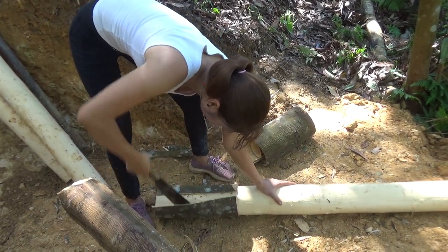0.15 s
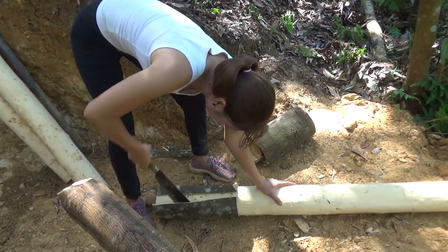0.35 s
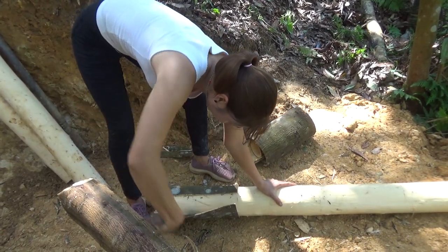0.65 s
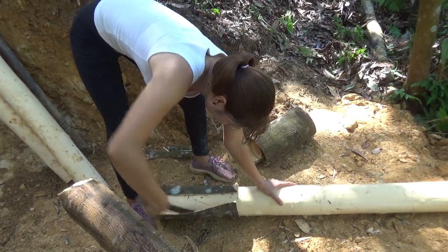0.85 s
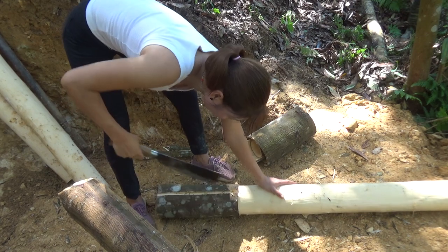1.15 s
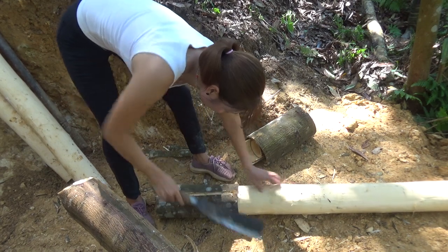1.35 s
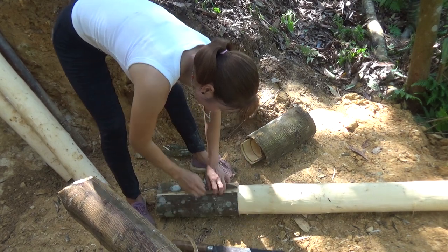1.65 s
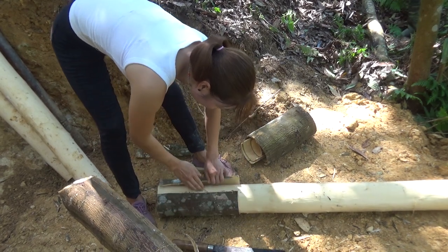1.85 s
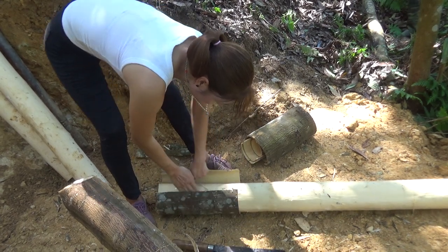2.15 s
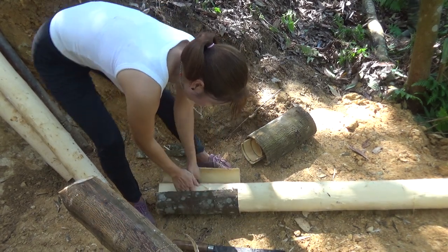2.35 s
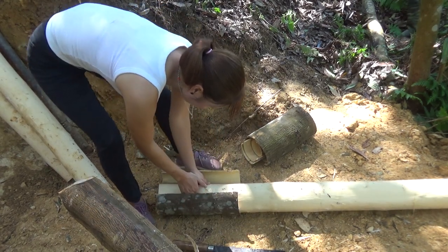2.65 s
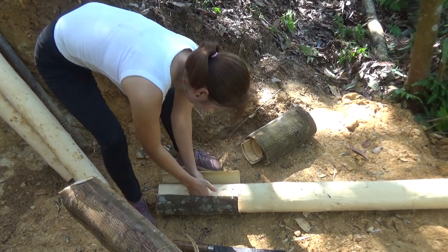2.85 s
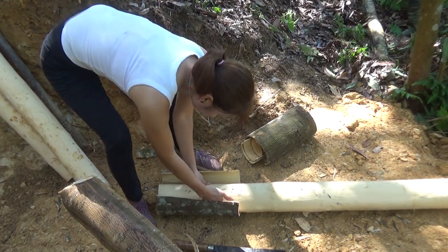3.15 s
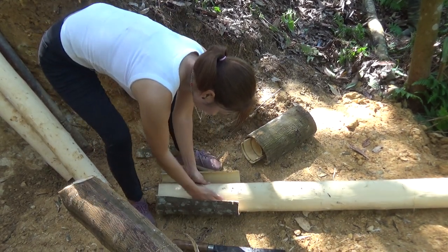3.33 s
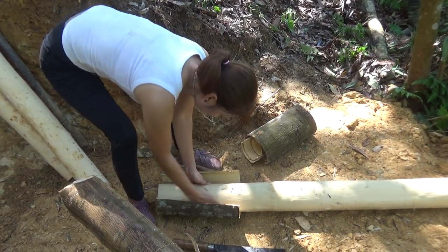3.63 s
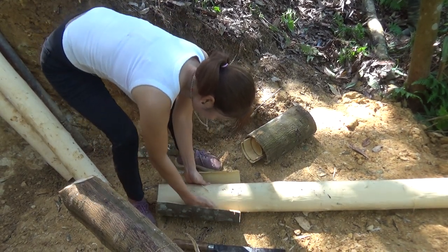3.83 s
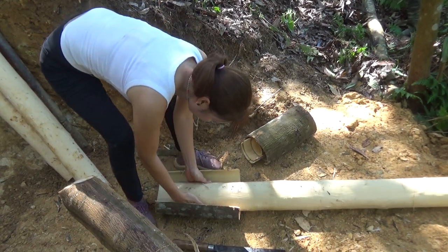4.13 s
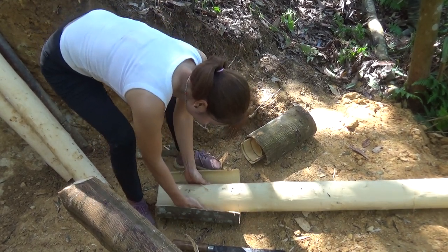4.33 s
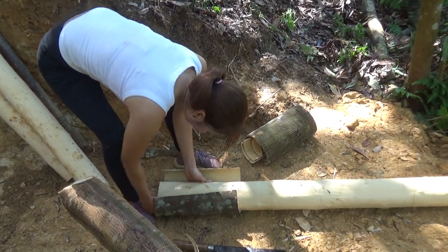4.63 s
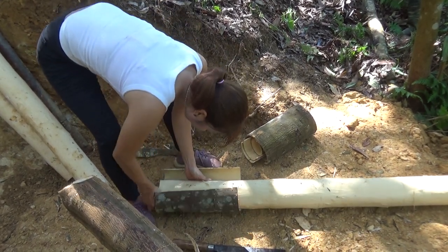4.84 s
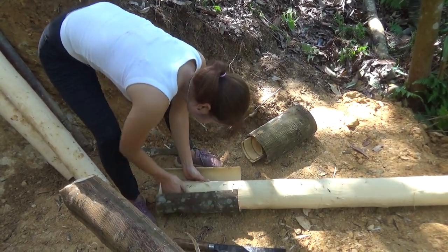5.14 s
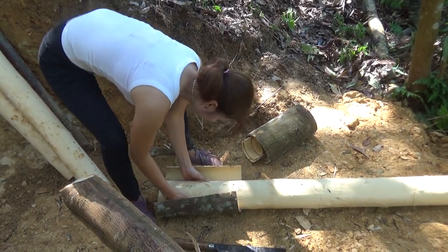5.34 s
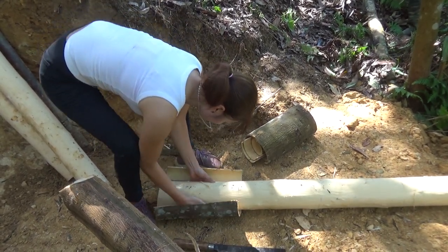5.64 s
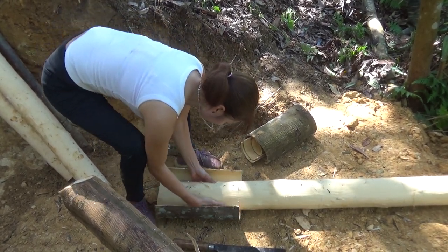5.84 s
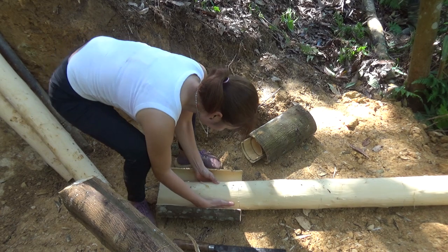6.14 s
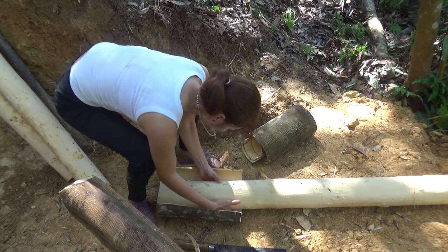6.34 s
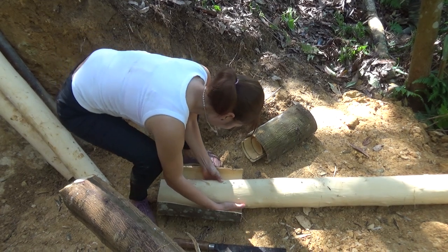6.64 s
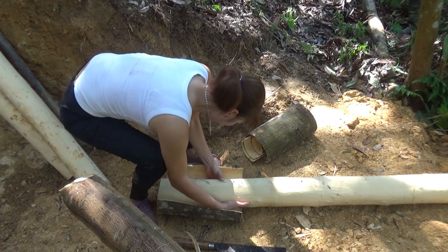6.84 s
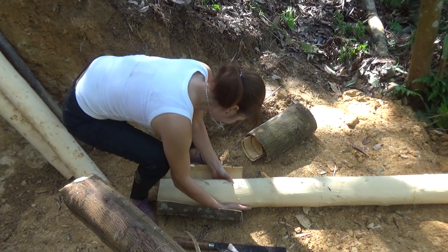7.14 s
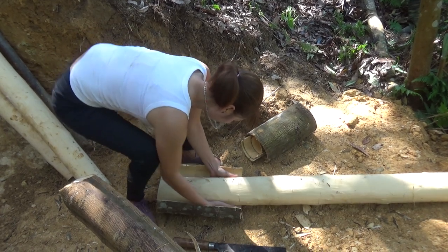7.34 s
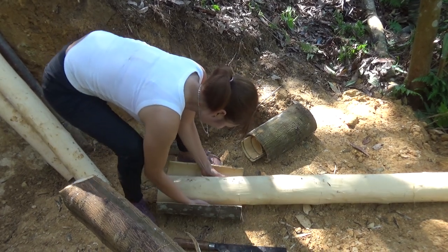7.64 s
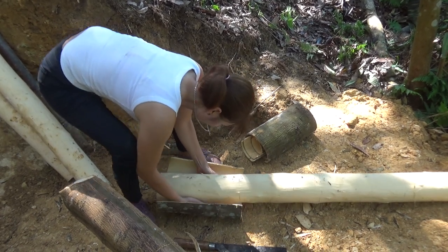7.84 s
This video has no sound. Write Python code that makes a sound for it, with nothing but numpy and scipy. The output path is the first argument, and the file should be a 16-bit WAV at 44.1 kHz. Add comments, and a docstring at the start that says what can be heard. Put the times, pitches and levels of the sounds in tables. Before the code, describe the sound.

Close, crisp ripping and snapping of bark peeled from a fresh log, after a blade rasps and clanks down, with insects droning faintly.

```python
"""A fresh log on a forest floor, with a close, nearly mono microphone pair. A machete scores the bark,
rasps out of the cut at 1 s and drops ringing on the dirt at 1.5 s. From 1.7 s two hands peel the bark
off as one curved shell: wet fibres tear, snap and rip, and the hollow shell resonates with them.
The sharpest crack comes at 5.5 s; near 7 s the shell flops down, and a last few fibres tear.
All around, insects drone in still air and a few far birds chirp."""
import sys
import numpy as np
from scipy import signal
from scipy.fft import rfft, irfft, next_fast_len
from scipy.io import wavfile
from scipy.ndimage import uniform_filter1d, map_coordinates

SR = 44100
rng = np.random.default_rng(int(sys.argv[2]) if len(sys.argv) > 2 else 0)


def dump(signal):
    """Clip the signal to [-1, 1] and save it as 16-bit WAV at the path in sys.argv[1]."""
    limited = np.clip(np.atleast_2d(signal).T, -1, 1)
    pcm = np.round(limited * 32767).astype(np.int16)
    wavfile.write(sys.argv[1], SR, pcm)


N = 351904

# modes of bark and log: (frequency [Hz], level [dB], t60 [s])
WOOD_MODES = [(472, -15, 0.038), (597, -2, 0.097), (668, 0.5, 0.12), (821, 9, 0.04), (1140, -1.5, 0.051),
              (1380, -3, 0.054), (1920, -14, 0.072), (2260, -1, 0.058), (2850, -12, 0.03)]


def peeling():
    """Wet fibres part by the thousand: a crisp hiss that also sounds the shell. Gives tugs and rips."""
    # tugs on the bark: (start [s], rise [s], hold [s], fibre level [dB], shell level [dB])
    tugs = [(-.05, 0.04, 0.018, -46.5, -57), (0.336, .05, 0.017, -55.5, -60.5),
            (0.516, 0.095, 0.12, -43, -53), (2.749, 0.18, 0.26, -38.5, -45.5),
            (3.327, 0.018, 0.042, -52.5, -60), (3.405, .11, 0.027, -32.5, -41.5),
            (3.66, 0.056, 0.023, -41.5, -55), (3.738, 0.096, 0.054, -35, -46.5),
            (4.04, 0.017, 0.058, -41, -59.5), (4.122, 0.12, 0.096, -38, -49.5),
            (4.368, .11, 0.014, -35, -45.5), (4.526, .02, 0.076, -54, -53), (5.14, 0.16, 0.031, -44.5, -49),
            (5.358, 0.031, .06, -44.5, -53.5), (5.441, 0.085, 0.034, -36.5, -43),
            (5.57, .03, 0.097, -43.5, -54), (5.685, 0.067, 0.089, -41, -55.5),
            (5.885, 0.14, 0.036, -41.5, -55), (6.042, .09, 0.17, -41, -53.5),
            (6.295, 0.069, .12, -44, -55.5), (6.486, 0.019, 0.26, -40.5, -54),
            (6.747, .08, 0.071, -39.5, -61), (6.933, 0.022, .035, -40, -58), (7.313, 0.042, 0.42, -43, -58),
            (7.76, 0.13, .15, -38.5, -53.5)]
    # the bark gives way at once: (start [s], rise [s], hold [s], level [dB])
    rips = [(2.341, 0.023, 0.0044, -36.5), (4.455, 0.029, 0.019, -24.5), (4.472, 0.0012, 0.0034, -21),
            (4.491, .004, 0.0047, -18.5), (6.151, .018, 0.019, -34), (6.504, 0.0044, 0.016, -41),
            (6.936, .001, 0.0052, -24), (6.947, 0.004, 0.046, -37.5)]
    # hands shift on the bark: (start [s], length [s], level [dB])
    rustles = [(0.136, 0.58, -63.5), (1.75, 0.23, -61), (2.425, .33, -58), (4.595, 0.46, -64)]
    lead_s = 0.0078  # the shell sounds just before the fibres part
    hand_damping_db_per_s = 12.5
    tear = np.sqrt(sum((amp(db) * effort(*timing)) ** 2 for *timing, db, _ in tugs))
    hollow = np.sqrt(sum((amp(db) * effort(s - lead_s, rise, hold, hand_damping_db_per_s)) ** 2
                         for s, rise, hold, _, db in tugs))
    rip = np.sqrt(sum((amp(db) * effort(*timing, release_db_per_s=1300)) ** 2 for *timing, db in rips))
    rustle = sum(amp(db) * effort(s, 0.028, length) for s, length, db in rustles)
    rustle *= amp(3 * wobble(25.13))
    tear = np.hypot(tear, rustle)
    hollow = np.hypot(hollow, amp(-6.5) * rustle)
    fibres = lambda hz, s: hiss_gain(hz, s, tear + rip)
    jerks = amp(wobble(35) + 0.5 * wobble(170))  # the tear front advances unevenly
    hiss = through_bark(fractures(rate=3500, spread_db=4, fizz=0.67), fibres)
    shell = through_bark(fractures(rate=1500, spread_db=0, fizz=0.63), shell_gain)
    burst = through_bark(fractures(rate=3700, spread_db=0.5, fizz=0.6), fibres)
    flex = coloured(rng.standard_normal(N), [(30, -17), (150, -3), (600, -2), (1500, -15), (5000, -50)])
    tugging = jerks * (tear * hiss + (hollow + amp(-21.5) * rip) * shell)
    return tugging, rip * (burst + amp(-24.5) * flex)


def effort(start, rise, hold, sag_db_per_s=0, release_db_per_s=253):
    """Gain of one effort: it builds up, is held and is let go."""
    t = clock()[::16] - start
    build_db = 24.5 * np.clip(1 - t / rise, 0, None) ** 2
    sag_db = sag_db_per_s * np.clip(t - rise, 0, None)
    release_db = release_db_per_s * np.clip(t - rise - hold, 0, None)
    return np.repeat(amp(-np.minimum(build_db + sag_db + release_db, 200)), 16)[:N]


def fractures(rate, spread_db, fizz):
    """Tiny breaks, rate a second, over a fizz of countless smaller ones."""
    sizes = rng.choice([-1, 1], N) * amp(spread_db * np.clip(rng.standard_normal(N), -2, 2))
    breaks = unit(sizes * (rng.random(N) < rate / SR))
    return unit(breaks + fizz * rng.standard_normal(N))


def through_bark(x, gain):
    """x through a gain(Hz, s) and the bark's many weak, drifting resonances, at steady power."""
    hz, s, spectrum = signal.stft(x, SR, nperseg=512)
    ripple = uniform_filter1d(rng.standard_normal(spectrum.shape), size=3, axis=0)
    ripple = uniform_filter1d(ripple, size=18, axis=1)
    response = gain(hz[:, None] + 1, s) * amp(2.5 * unit(ripple))
    power = np.mean(abs(spectrum) ** 2, 1, keepdims=True)
    response /= np.sqrt(np.sum(power * response ** 2, 0))
    return unit(signal.istft(spectrum * response, SR, nperseg=512)[1][:N])


def hiss_gain(hz, s, tear):
    """The harder the tug, the brighter the fibres hiss."""
    # tearing fibres, before the grip shifts their peak: (frequency [Hz], level [dB])
    fibre_spectrum = [(200, -42), (1500, -18.5), (3000, -16), (4200, -12.5), (5000, -9), (6200, -0.5),
                      (8000, 1), (11000, -1), (13500, -4.5), (15700, -9.5)]
    usual_tug_db, tilt_per_db = -43.5, 0.22
    *_, tilt, centre = grip_at(s)
    hard_db = np.clip(20 * np.log10(np.interp(s, clock(), tear)) - usual_tug_db, -7, 7)
    f, db = np.transpose(fibre_spectrum)
    colour = np.interp(np.log(hz / centre), np.log(f / f[db.argmax()]), db)
    return amp(colour + (tilt + tilt_per_db * hard_db) * np.log2(np.maximum(hz, 5000) / centre))


def shell_gain(hz, s):
    """A close pair of resonances of the curled bark and a higher one, over its broad woody response."""
    lower, width, upper, upper_db, _, _ = grip_at(s)
    pair = np.hypot(hump(hz, lower - width / 3, 0.75 * width) ** 2,
                    hump(hz, lower + width / 3, 0.97 * width) ** 2)
    wood = amp(-5.5) * hump(hz, 658, 160) ** 2 + amp(-9.5) * hump(hz, 2400, 2600) ** 2
    higher = amp(upper_db) * hump(hz, upper, 380) ** 2
    return np.sqrt(pair ** 2 + higher ** 2 + wood ** 2)


def grip_at(s):
    """Each grip leaves another part of the shell free to ring. Gives its settings at the times s."""
    # grips: (start [s], lower resonance [Hz], its width [Hz], upper resonance [Hz], its level [dB],
    # hiss tilt [dB/octave], hiss centre [Hz])
    grips = [(0, 1360, 505, 2720, -1, 0, 7900), (1.7, 1140, 330, 1920, -2, -4, 8200),
             (2.85, 1155, 355, 2300, -10, -5, 7450), (3.12, 1126, 328, 2300, -12.5, -1, 7550),
             (4.0, 1094, 191, 1940, 1, 0.5, 8100), (5.0, 940, 607, 2640, 2, 1.5, 8200),
             (5.45, 880, 614, 1850, 1.5, -2.5, 7800), (5.9, 1250, 316, 2400, 0.5, -1, 7600),
             (6.35, 1320, 348, 1980, 4, -2.5, 8130), (7.2, 650, 280, 1620, -2.5, -1.5, 7800)]
    glide_s = 0.06
    starts, *settings = np.transpose(grips)
    held = np.array(settings)[:, np.searchsorted(starts[1:], s)]
    return uniform_filter1d(held, size=int(glide_s / (s[1] - s[0])) + 1, axis=1)


def snaps():
    """A strong fibre breaks: a sharp crack, a short scatter off the ground and a knock of the wood."""
    # single fibres: (time [s], relative level [dB], relative share of knock [dB])
    breaks = [(.383, -21, -24), (.429, -26, -18), (1.870, -29, -15), (1.891, -24, -22), (1.957, -31.5, -17),
              (1.9902, -27.5, -11), (2.112, -22, -26), (2.1642, -21, -20), (2.1722, -17, -26),
              (2.208, -17.5, -4.5), (2.2318, -20, -12), (2.244, -20.5, -7.5), (2.2692, -20.5, -10),
              (2.3171, -29, -22), (2.3391, -22, -19), (2.36, -5, -16.5), (5.293, -24, -17),
              (5.385, -28, -12), (5.5421, 2, -33.5), (6.937, -12, -16)]
    # the crack: (frequency [Hz], level [dB])
    crack_spectrum = [(150, -33), (600, -2), (2000, -9.5), (4200, -13.5), (6500, -1), (11000, -1),
                      (16000, -7.5)]
    out, t = np.zeros(N), clock(7600)
    for s, db, knock_db in breaks:
        t60 = 0.031 * 2 ** (knock_db / 9.5)  # thick fibres knock more and crack longer
        fall = decay(t, t60) + amp(-29.5) * decay(t, 0.046) + amp(-28) * decay(t, 0.28)
        tilt = 2 * np.log2(0.0097 / t60)  # quicker breaks are brighter
        spectrum = [(hz, level + tilt * np.log2(max(hz, 5000) / 5000)) for hz, level in crack_spectrum]
        crack = coloured(rng.standard_normal(len(t)), spectrum) * fall
        knock = ring(WOOD_MODES, t, strongest_hz=1390, octaves=0.77) * attack(t, 0.0002)
        add(out, s + 0.0008, amp(db - 9.5) * (crack + amp(knock_db - 1.5) * knock))
    return out


def machete():
    """The edge rasps out of the cut; then the blade falls on grit, rings, bounces and rocks."""
    # the blade slides out: (time [s], level [dB])
    slide = [(.94, -65), (.96, -54), (.968, -43), (1.0, -35.5), (1.017, -33.5), (1.023, -32), (1.036, -31),
             (1.041, -43), (1.055, -49)]
    # the rasping edge: (frequency [Hz], level [dB])
    edge_spectrum = [(40, -35), (200, -12), (900, -23), (1600, -9.5), (2400, -25), (3800, -21), (4800, -8),
                     (5130, -7), (5500, -15), (6300, -2.5), (7000, -1), (9300, -3), (11000, -14),
                     (15500, -21)]
    # the steel blade: (frequency [Hz], level [dB], t60 [s])
    blade_modes = [(690, -3, .2), (2589, -19, .16), (3850, -20, .06), (4463, -9, .11), (5130, -10, .06),
                   (5916, -3, .16), (6315, -7, .05), (7079, -4, .12), (8274, -2, .17), (9216, -5, .07),
                   (9572, -7, .13), (11050, -3, .1), (11800, -7, .07), (12540, -9, .07), (13780, -4, .07)]
    # it springs free, lands and bounces: (time [s], ring [dB], strongest [Hz], grit [dB], grit rise [s])
    clanks = [(1.034, -35.5, 4230, -53, .001), (1.036, -38, 8500, -43, .001),
              (1.5023, -25, 8600, -24.5, 0.00038), (1.537, -56, 7000, -36, 0.0017),
              (1.555, -28, 6440, -27.5, 0.0043), (1.578, -41, 6500, -22, 0.0022),
              (1.594, -29, 2930, -37, .001), (1.598, -28.5, 6700, -30, .0005), (1.7, -52, 7000, -37, .004),
              (1.721, -33.5, 9500, -37, 0.0018)]
    # grit under the steel: (frequency [Hz], level [dB])
    grit_spectrum = [(30, -29), (150, 7), (500, -2), (900, -9.5), (1400, -2), (2200, -2), (3500, -10),
                     (6500, 1.5), (10000, -2.5), (15500, -5)]
    t = clock(16384)
    scuff = amp(-55) * effort(start=0.18, rise=0.017, hold=0.045)  # the blade is set against the bark
    rasp = coloured(fractures(rate=2700, spread_db=2.5, fizz=0.49), edge_spectrum)
    scrape = (curve(slide) + scuff) * rasp
    squeal = noise_band(centre=5070, width=160)  # the edge sticks and slips
    scrape += squeal * curve([(0.965, -58), (1.0, -46), (1.025, -56)])
    held_ring = ring(blade_modes, t, strongest_hz=7050, octaves=2.2) * decay(t, 0.034)  # the cut damps it
    ringing = unit(signal.fftconvolve(scrape, held_ring)[:N]) * np.std(scrape)
    out = amp(-1.5) * scrape + amp(-1) * ringing
    for s, ring_db, hz, grit_db, rise in clanks:
        grit = coloured(rng.standard_normal(len(t)), grit_spectrum) * attack(t, rise) * decay(t, 0.06)
        octaves = 0.3 if s < slide[-1][0] else 1.2  # a held blade sounds few modes
        add(out, s, amp(grit_db) * grit + amp(ring_db) * ring(blade_modes, t, hz, octaves))
    handle = lambda hz: hump(hz, 1680, 950) ** 2 + 0.35 * hump(hz, 8700, 6000)
    for s in 1.634 + 0.013 * np.arange(5):  # the handle rocks to rest
        tap = unit(filtered(rng.standard_normal(len(t)), handle))
        add(out, s, amp(-41.5) * tap * t / 0.0032 * np.exp(1 - t / 0.0027))
    return out


def bumps():
    """Soft contacts wake the low modes of the wood; the hands soon damp them."""
    # the shell meets log or ground: (time [s], relative level [dB], strongest [Hz], grip t60 [s])
    contacts = [(2.492, -43, 710, 0.059), (2.562, -43.5, 646, 0.17), (5.157, -44.5, 800, .06),
                (5.387, -33, 940, .036), (5.5425, -25.5, 836, 0.095), (5.931, -42.5, 900, .05),
                (6.939, -27, 663, 0.32)]
    out, t = np.zeros(N), clock(8192)
    for s, db, hz, t60 in contacts:
        envelope = attack(t, 0.00035) * decay(t, t60)
        add(out, s, amp(db + 1.5) * envelope * ring(WOOD_MODES, t, strongest_hz=hz, octaves=0.37))
    return out


def thuds():
    """The ground takes a blow with a few low cycles that sag in pitch."""
    # dull blows: (time [s], relative level [dB], final pitch [Hz])
    blows = [(1.503, -35.5, 418), (1.51, -42, 140), (1.587, -27, 226), (1.607, -35.5, 125),
             (4.501, -38, 110), (5.541, -39.5, 150), (6.937, -27, 213), (6.938, -36, 396)]
    out, t = np.zeros(N), clock(8192)
    for s, db, hz in blows:
        turns = np.cumsum(hz * (1 + 0.5 * np.exp(-t / 0.0033))) / SR
        add(out, s, amp(db + 5) * attack(t, 0.0014) * decay(t, 0.037) * np.sin(2 * np.pi * turns))
    return signal.sosfilt(signal.butter(2, 90, "highpass", fs=SR, output="sos"), out)


def side_scatter(x):
    """Quick scatter from the log and the ground reaches the two microphones differently."""
    t = clock(1024)
    spectrum = [(100, 2), (600, 20), (1200, 29), (2200, -9), (6000, -45), (15000, -1)]
    echoes = coloured(rng.standard_normal(len(t)), spectrum) * decay(t, 0.022)
    return signal.fftconvolve(x, echoes / np.linalg.norm(echoes))[:N]


def forest():
    """Behind the log: still air, insect drones and a few far birds."""
    # forest air: (frequency [Hz], level [dB])
    air_spectrum = [(12, -55), (20, -33), (70, -4.5), (177, -2.5), (293, -4), (485, -8), (607, -10.5),
                    (678, -11), (1190, -12), (1530, -15), (1910, -16), (4940, -21), (7520, -14),
                    (8650, -21.5), (16000, -25.5)]
    # drones: (centre [Hz], width [Hz], level [dB], start [s], end [s])
    insects = [(7240, 170, -65.5, 0, 4.4), (7700, 140, -61, 0, 0.46), (7600, 170, -60.5, 4.5, 5.3),
               (7340, 250, -66, 6.5, 8.7), (7730, 2500, -64.5, 0.5, 9.9)]
    # far birds: (time [s], starting pitch [Hz], level [dB])
    chirps = [(.27, 3420, -67), (.85, 3400, -64), (1.41, 3400, -65), (2.09, 3500, -65), (1.365, 6480, -57),
              (4.815, 6140, -59)]
    chirp_cycles, pitch_fall, pitch_blur = 380, 0.04, 0.017  # higher chirps are shorter
    t = clock()
    out = amp(-56) * coloured(rng.standard_normal(N), air_spectrum) * amp(0.83 * wobble(2.83))
    for centre, width, db, start, end in insects:
        gate = uniform_filter1d(1.0 * ((t >= start) & (t < end)), size=4000)
        out += amp(db) * noise_band(centre, width) * gate
    for s, hz, db in chirps:
        progress = np.clip((t - s) * hz / chirp_cycles, 0, 1)
        pitch = hz * (1 - pitch_fall * progress) * (1 + pitch_blur * wobble(500))
        out += amp(db) * np.sin(np.pi * progress) * np.sin(2 * np.pi * np.cumsum(pitch) / SR)
    return out


def ring(modes, t, strongest_hz, octaves):
    """Decaying modes; the kind of contact favours those near one frequency, chance does the rest."""
    hz, db, t60 = np.transpose(modes)[:, :, None]
    chance_db = 2 * rng.standard_normal(db.shape)
    size = amp(db + chance_db) / (1 + (np.log2(hz / strongest_hz) / octaves) ** 2)
    phase = 2 * np.pi * rng.random(db.shape)
    return np.sum(size * decay(t, t60) * np.sin(2 * np.pi * hz * t + phase), 0) / np.linalg.norm(size)


def amp(db):
    return 10 ** (np.asarray(db) / 20)


def unit(x):
    return x / np.sqrt(np.mean(x ** 2) + 1e-20)


def clock(size=N):
    return np.arange(size) / SR


def attack(t, rise):
    return 1 - np.exp(-t / rise)


def decay(t, t60):
    return amp(-60 * t / t60)


def curve(points):
    """Gain per sample from (time [s], level [dB]) points, silent outside them."""
    db = np.interp(clock(), *np.transpose(points), left=-140, right=-140)
    return uniform_filter1d(amp(db), size=40)


def wobble(rate):
    """A smooth random curve, rate knots a second."""
    return map_coordinates(rng.standard_normal(4096), [clock() * rate], mode="wrap")


def filtered(x, response):
    """x times a response of frequency."""
    size = next_fast_len(x.shape[-1] + 8192)
    return irfft(rfft(x, size) * response(np.fft.rfftfreq(size, 1 / SR)), size)[..., :x.shape[-1]]


def coloured(x, points):
    """x through a (frequency [Hz], level [dB]) curve, at rms 1."""
    f, db = np.transpose(points)
    return unit(filtered(x, lambda hz: amp(np.interp(np.log(hz + 1), np.log(f), db))))


def hump(hz, centre, width):
    """Gain of one resonance."""
    return hz * width / np.hypot(centre ** 2 - hz ** 2, hz * width)


def noise_band(centre, width):
    return unit(filtered(rng.standard_normal(N), lambda hz: hump(hz, centre, width) ** 2))


def add(track, s, sound):
    """Mix a sound in at time s."""
    span = track[max(round(s * SR), 0):][:len(sound)]
    span += sound[:len(span)]


def scene():
    """The log lies close in front, its sharp sounds a little to the left, the forest around it."""
    tugs, rips = peeling()
    soft = tugs + bumps() + thuds()
    sharp = rips + snaps() + machete()
    side_air = coloured(rng.standard_normal(N), [(25, -18), (90, -7), (160, 1.5), (500, -2.5),
                                                 (1200, -10.5), (3000, -42.5), (7500, -14.5), (15000, -50)])
    side = amp(-75) * side_air + amp(-40) * side_scatter(soft + sharp)
    close = soft * amp([[0.05], [-0.05]]) + sharp * amp([[0.35], [-0.35]])
    return close + forest() + np.array([side, -side])


def record(dry):
    """The recorder keeps nothing above its band limit."""
    return filtered(dry, lambda hz: hz < 15900)


dry = scene()
out = record(dry)
dump(out)
```